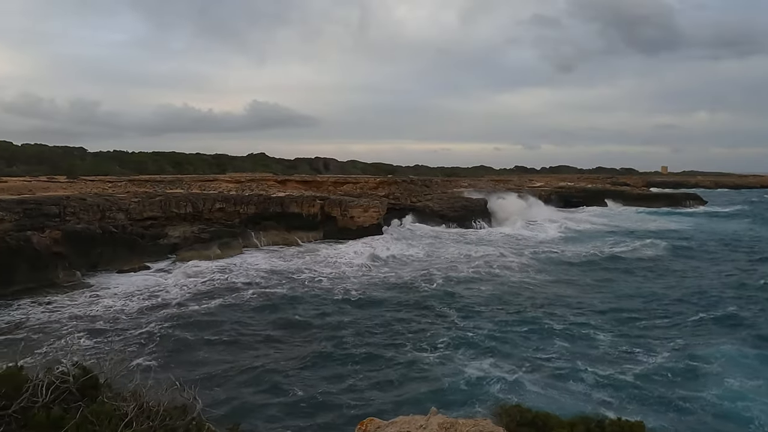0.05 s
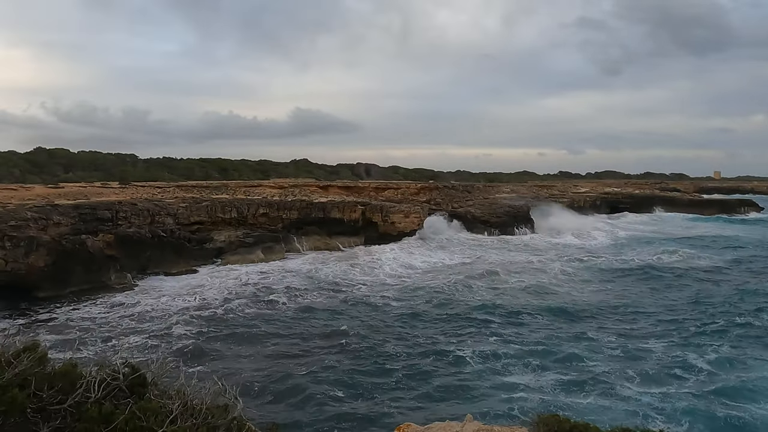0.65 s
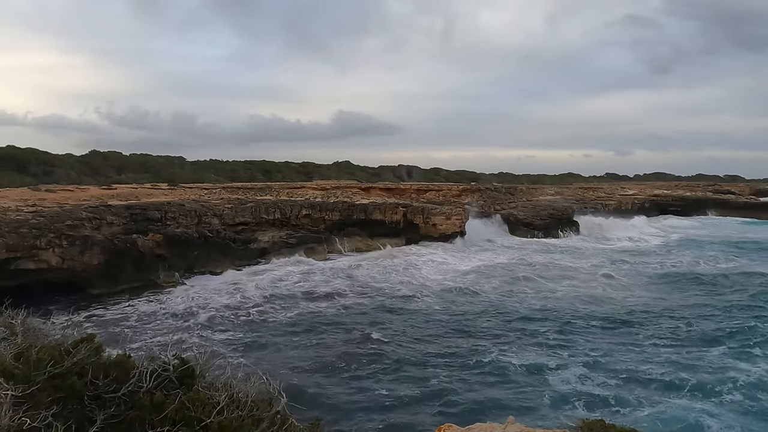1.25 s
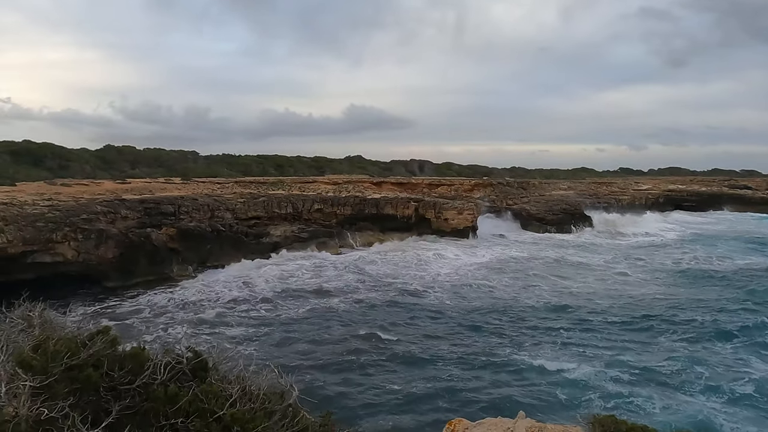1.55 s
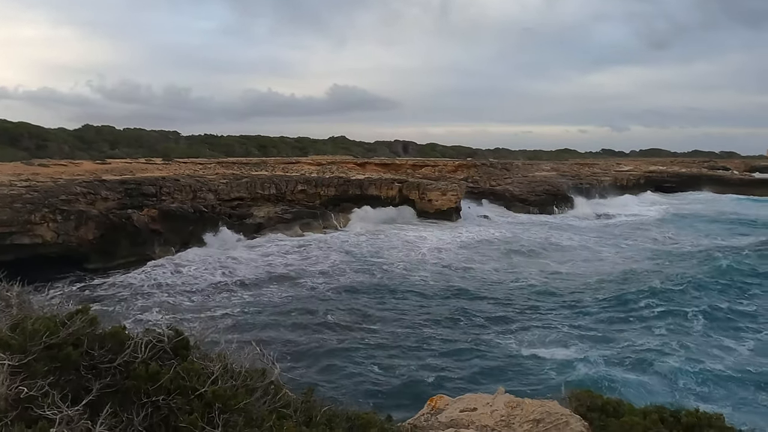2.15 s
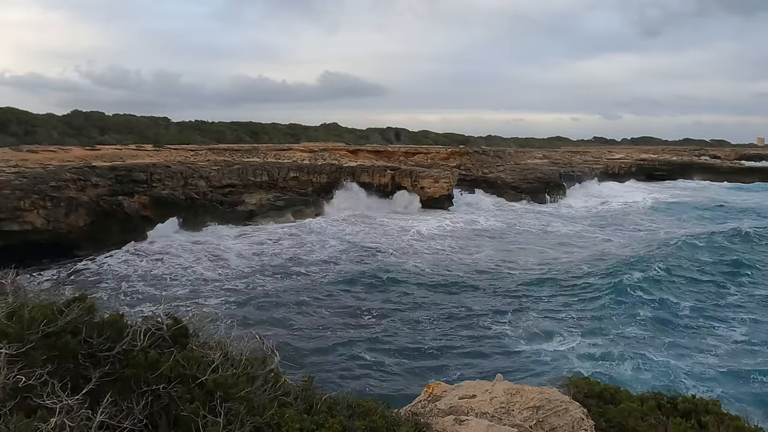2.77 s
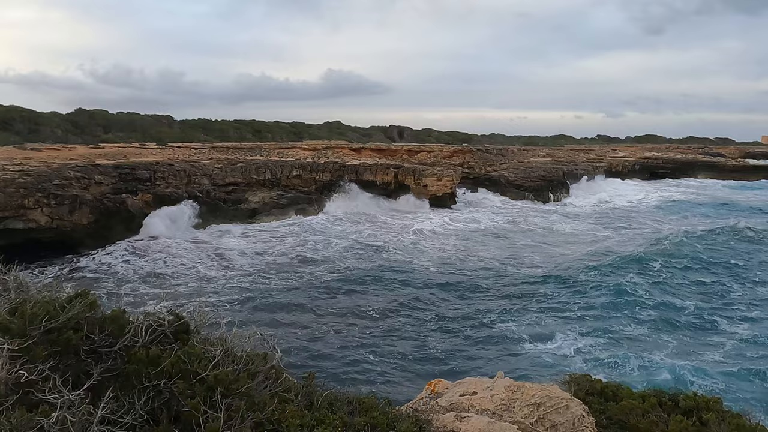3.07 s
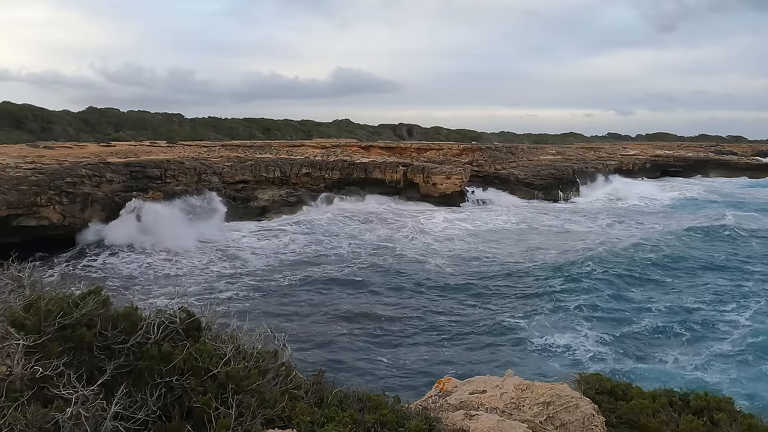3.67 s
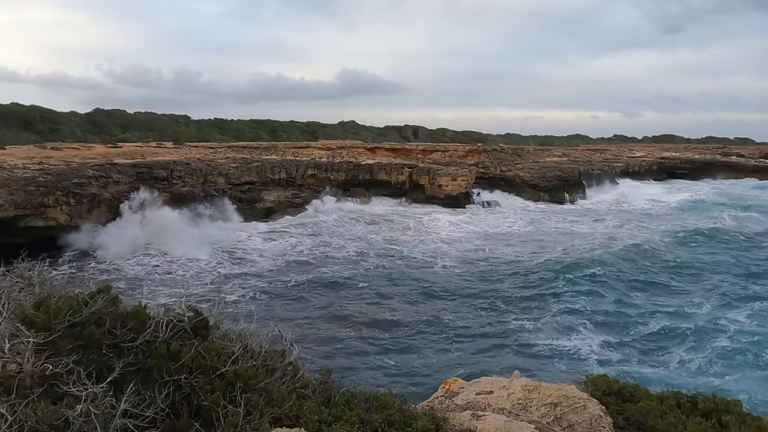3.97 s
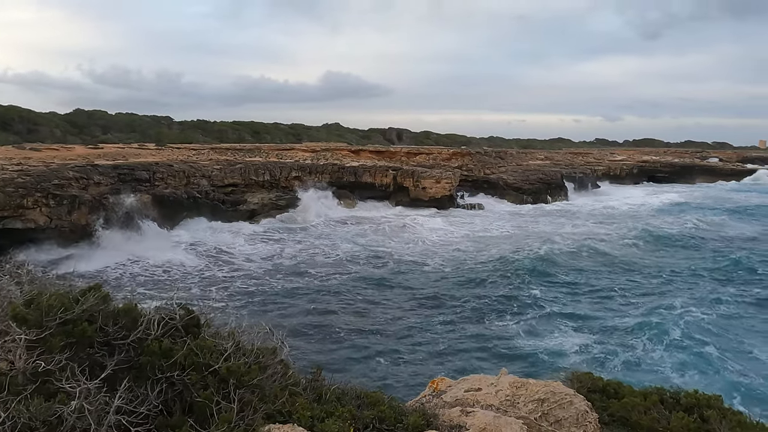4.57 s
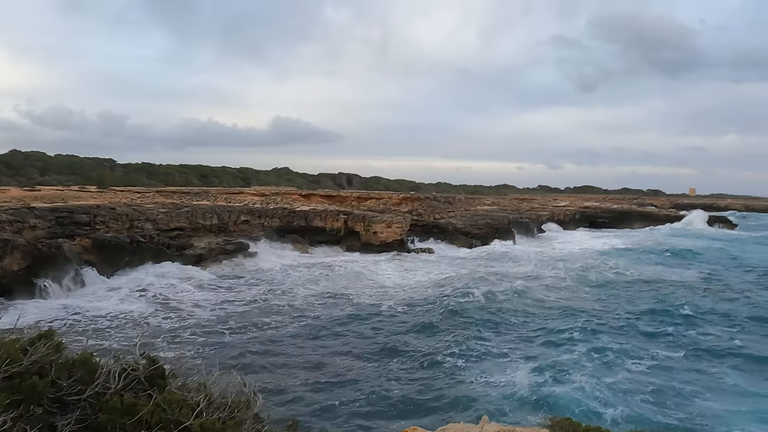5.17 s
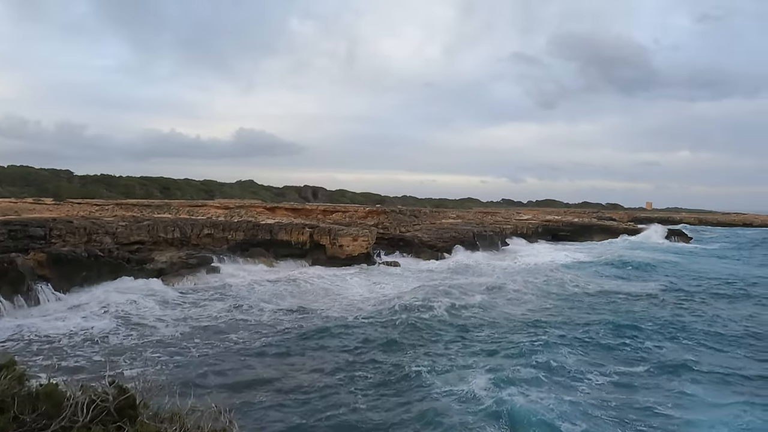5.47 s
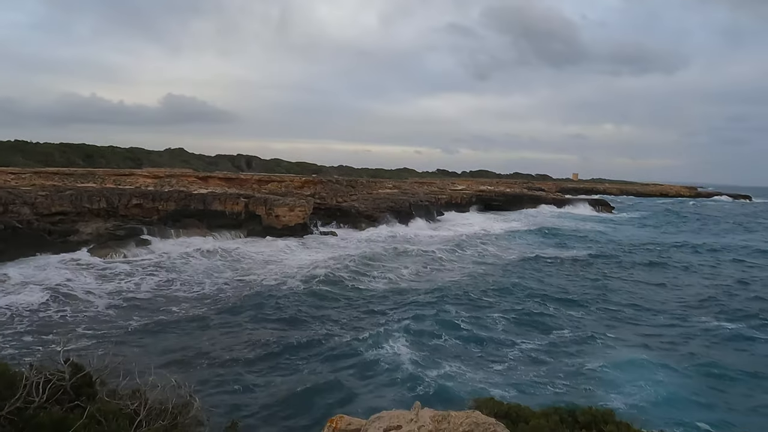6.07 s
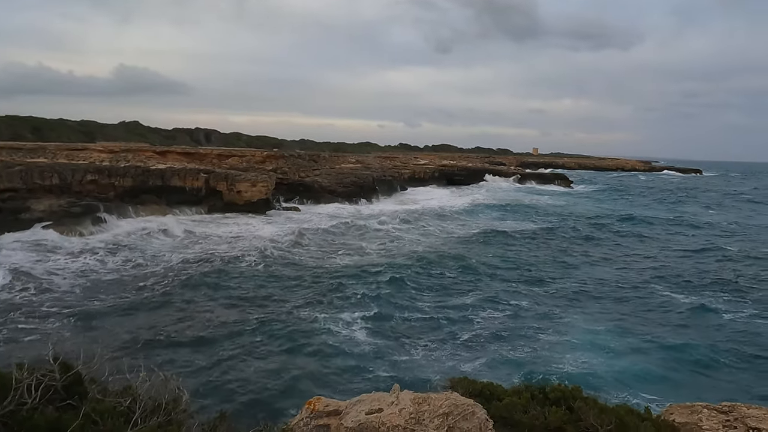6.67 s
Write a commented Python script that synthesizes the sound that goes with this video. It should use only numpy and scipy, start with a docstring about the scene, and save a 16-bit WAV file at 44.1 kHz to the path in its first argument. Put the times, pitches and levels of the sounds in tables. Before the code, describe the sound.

Sea waves wash against low rocky cliffs throughout, a continuous rush with a low roar underneath and hissing spray on top. Strong wind hits the microphone on the cliff top in deep, uneven rumbles, heaviest in the first second and a half. The surf swells at about 1 and 2 seconds, and water slaps into rock hollows with two soft, low thuds near 2.2 and 2.7 seconds. Another wave breaks around 3.7 to 4 seconds, and the brightest hiss of spray comes at about 5 seconds. More gusts buffet the microphone near 3.3, 3.5 and 4.6 seconds, then grow weaker. Dry scrub close by rustles faintly around 2 seconds and gives a few tiny ticks, mostly between 5.4 and 6 seconds. The sea keeps washing, with one more swell near 7 seconds.

```python
"""On a low rocky cliff top, in a strong wind, with surf washing along the rocks below.
Churning clouds of bubbles roar, breaking water and falling spray hiss, and now and then
a wave traps air in a rock hollow with a thud. Eddies (swirls of air) buffet the microphone,
and dry scrub beside it rustles and ticks."""
import sys
import numpy as np
from scipy import signal
from scipy.fft import rfft, irfft, next_fast_len
from scipy.io import wavfile
from scipy.ndimage import uniform_filter1d

SR = 44100
rng = np.random.default_rng(int(sys.argv[2]) if len(sys.argv) > 2 else 0)


def generate_wav(sig):
    """Save sig (samples, or channels by samples) to the path in sys.argv[1] as 16-bit PCM at SR."""
    pcm = np.round(np.clip(np.atleast_2d(sig).T, -1, 1) * 32767).astype(np.int16)
    wavfile.write(sys.argv[1], SR, pcm)


N = 305613
T = np.arange(N) / SR


def undb(db):
    """Turn decibels into a gain to multiply by."""
    return 10 ** (np.asarray(db) / 20)


def unit(x):
    """Scale a signal to an average strength (rms) of 1."""
    return x / np.sqrt(np.mean(x ** 2))


def colour(x, spectrum):
    """Shape the bass and treble of x along a curve of (f/Hz, level/dB) points."""
    size = next_fast_len(N + SR // 2)
    hz, db = np.transpose(spectrum)
    f = np.maximum(np.arange(size // 2 + 1) * SR / size, 0.5)
    gain = undb(np.interp(np.log(f), np.log(hz), db))
    return irfft(rfft(x, size) * gain, size)[:N]


def wander(per_second):
    """A smooth random wobble that heads for a new value per_second times a second."""
    hold = max(int(SR / per_second), 2)
    steps = np.repeat(rng.standard_normal(N // hold + 2), hold)
    steps = steps[rng.integers(hold):][:N]
    return unit(uniform_filter1d(uniform_filter1d(steps, hold), hold))


def grains(per_second, spread_db):
    """A shower of tiny impacts of random strength."""
    hits = (rng.random(N) < per_second / SR) * rng.standard_normal(N)
    return unit(hits * undb(spread_db * np.minimum(rng.exponential(size=N), 4)))


def swell(s, rise_s, fall_s):
    """A gain that grows to 1 at time s and dies away again."""
    return np.exp(-np.abs(T - s) / np.where(T < s, rise_s, fall_s))


def scrub(rustle_db=4, stir_db=-78, tick_s=.003, tick_db=-5):
    """Dry twigs stir faintly and brush each other in a gust; single ones tick."""
    # bursts of rustling: t/s, build-up/s, die-away/s, relative level/dB
    rustles = [(1.9, 0.11, 0.11, -60), (6.93, .05, .14, -62)]
    # single twigs ticking: t/s, relative level/dB
    ticks = [(.459, -46), (.745, -48), (.882, -43), (3.895, -38), (5.381, -33), (5.392, -38), (5.892, -36),
             (6.055, -42)]
    # tone of the rustle: f/Hz, level/dB
    rustle_tone = [(1500, -25), (4000, -6), (8000, 9.5), (11000, 3.5), (15500, -3)]
    # tone of a tick: f/Hz, level/dB
    tick_tone = [(1500, -20), (4000, -1), (6500, 6), (8500, -2), (11000, -9), (15500, -15)]
    brushing = undb(stir_db) + sum(undb(db) * swell(s, rise, fall) for s, rise, fall, db in rustles)
    rustle = grains(per_second=5000, spread_db=-3.0) * undb(rustle_db) * brushing
    taps = sum(undb(db + tick_db) * (T >= s) * np.exp(-np.abs(T - s) / tick_s) for s, db in ticks)
    return colour(rustle, rustle_tone) + colour(taps * rng.standard_normal(N), tick_tone)


def eddies(spectrum, span_s):
    """Swirling air pushes at random, its strength kept even over span_s seconds."""
    pressure = colour(rng.standard_normal(N), spectrum)
    size = max(int(span_s * SR), 2)
    power = uniform_filter1d(uniform_filter1d(pressure ** 2, size), size)
    return pressure / np.sqrt(power + 1e-12)


def gusting(breeze_flutter_db=-10):
    """Gains of deep buffeting and finer flutter: short gusts ride on the breeze."""
    # the wind between gusts: t/s, level/dB
    breeze = [(0, -25.5), (1.6, -23), (1.8, -35), (4.5, -28.5), (5.4, -31.5), (5.75, -40.5), (6.93, -32.5)]
    # gusts hitting the microphone: t/s, half length/s, buffeting/dB, flutter/dB
    gusts = [(0.077, .05, -15, -41), (0.555, 0.19, -22.5, -32.5), (0.865, 0.054, -16, -27.5),
             (1.04, 0.088, -17, -39), (1.29, 0.087, -12.5, -41), (1.367, 0.072, -32, -21.5),
             (2.19, 0.087, -19, -40), (2.484, 0.096, -29, -36), (2.968, 0.088, -30, -34.5),
             (3.24, 0.048, -17.5, -47), (3.518, 0.057, -16.5, -44), (4.576, 0.1, -17, -35),
             (5.364, 0.061, -30, -33), (5.52, .04, -25, -38), (5.975, 0.077, -24.5, -55),
             (6.707, .05, -30, -39)]
    times, breeze_db = np.transpose(breeze)
    buffet = undb(np.interp(T, times, breeze_db))
    flutter = buffet * undb(breeze_flutter_db)
    for s, half_s, buffet_db, flutter_db in gusts:
        gust = np.exp(-((T - s) / half_s) ** 2)
        buffet = np.hypot(buffet, undb(buffet_db) * gust)
        flutter = np.hypot(flutter, undb(flutter_db) * gust)
    return buffet, flutter


def wind(sway_db=-15.0, unrest_db=1.5):
    """Large eddies sway the air pressure; gusts shed smaller ones that rumble on the microphone."""
    # tone of the deep buffeting: f/Hz, relative level/dB
    buffet_tone = [(8, -9.5), (18, 2), (30, 8.5), (46, -6.5), (65, -18), (120, -42.5), (600, -87)]
    # tone of the finer flutter: f/Hz, relative level/dB
    flutter_tone = [(20, -20), (50, 2), (68, 0.5), (100, -10), (200, -21), (500, -36.5), (2000, -75)]
    # the slow sway, mostly too low to hear: f/Hz, relative level/dB
    sway_tone = [(1, 5.5), (4, 5.5), (9, 5.5), (14, 0.5), (22, -15), (40, -30), (100, -62), (300, -100)]
    buffet_gain, flutter_gain = gusting()
    buffet = buffet_gain * eddies(buffet_tone, span_s=0.073)
    flutter = flutter_gain * eddies(flutter_tone, span_s=0.066)
    sway = undb(sway_db) * eddies(sway_tone, span_s=0.21)
    return sway + (buffet + flutter) * undb(unrest_db * wander(per_second=18))


def hollows(width_s=0.012, roughness=0.51):
    """Air trapped by a wave in a rock hollow swells into a short low note."""
    # water slapping into hollows: t/s, f/Hz, peak level/dB
    thuds = [(2.15, 178.6, -29.5), (2.725, 177.2, -30)]
    out = 0
    for s, hz, db in thuds:
        note = np.sin(2 * np.pi * hz * T + roughness * wander(per_second=60))
        out = out + undb(db) * np.exp(-((T - s) / width_s) ** 2) * note
    return out


def churn(x, depth_db, per_second):
    """Bubble clouds of each size swell and collapse on their own, so every octave flutters."""
    out, rest = 0, x
    for edge_hz in 150 * 2 ** np.arange(7):
        band = signal.sosfiltfilt(signal.butter(2, edge_hz, fs=SR, output="sos"), rest)
        out = out + band * undb(depth_db * wander(per_second))
        rest = rest - band
    return unit(out + rest)


def breaking(roar_linger=1.03):
    """Gains of roar, wash and spray: each breaking wave adds its power to the restless sea."""
    # the sea between waves, in relative levels: roar/dB, wash/dB, spray/dB
    sea_db = (-43, -45.5, -57)
    # waves on the rocks: crest t/s, build-up/s, die-away/s, then relative roar/dB, wash/dB, spray/dB
    breakers = [(.38, .16, 0.27, -41.5, -46, -56.5), (.85, 0.11, 0.49, -44, -45, -56),
                (1.15, 0.22, 0.98, -39.5, -46, -64), (1.98, 0.63, 0.32, -43, -41.5, -52.5),
                (2.25, .25, 1.0, -43, -47, -58), (3.25, 0.78, 0.78, -55, -44, -52),
                (3.68, 0.37, 0.34, -39, -41.5, -51), (4.0, 0.28, 0.57, -42, -44, -53),
                (4.98, 0.47, 0.37, -42, -40, -46), (5.6, 0.67, 0.78, -44, -44.5, -54.5),
                (6.08, 0.21, .4, -46.5, -48.5, -61), (6.9, 0.37, .6, -45, -44, -57.5)]
    roar, wash, spray = undb(sea_db) ** 2
    for s, rise_s, fall_s, roar_db, wash_db, spray_db in breakers:
        wave = swell(s, rise_s, fall_s)
        roar = roar + (undb(roar_db) * swell(s, rise_s, fall_s * roar_linger)) ** 2
        wash = wash + (undb(wash_db) * wave) ** 2
        spray = spray + (undb(spray_db) * wave) ** 2
    return np.sqrt([roar, wash, spray])


def surf(roar_db=1.79, wash_db=1, spray_db=2.0):
    """Big bubble clouds roar, breaking water washes over rock, and drops of spray patter back."""
    # low tone of the bubble clouds: f/Hz, relative level/dB
    roar_tone = [(40, -10), (110, 3.5), (170, 0), (260, -0.5), (420, -0.5), (650, -4), (1000, -12.5),
                 (2000, -31.5), (6000, -60)]
    # middle tone of the washing water: f/Hz, relative level/dB
    wash_tone = [(200, -20), (500, -6.5), (850, 0), (1300, -1.5), (2000, -4.5), (3000, -9), (4000, -13),
                 (5500, -20), (8000, -26.5), (15500, -66)]
    # high tone of the spray: f/Hz, relative level/dB
    spray_tone = [(1500, -18), (3000, 3), (4200, 1.5), (5500, -0.5), (7000, -5), (8300, -3.5), (9200, -8.5),
                  (10300, -16), (12300, -18), (14000, -21), (15600, -30)]
    roar_gain, wash_gain, spray_gain = breaking()
    bubbles = colour(rng.standard_normal(N), roar_tone)
    roar = roar_gain * churn(bubbles, depth_db=1.6, per_second=14)
    water = colour(grains(per_second=22000, spread_db=0.7), wash_tone)
    wash = wash_gain * churn(water, depth_db=0.93, per_second=18)
    drops = unit(colour(grains(per_second=24000, spread_db=0.6), spray_tone))
    spray = spray_gain * drops * undb(0.72 * wander(per_second=28))
    return undb(roar_db) * roar + undb(wash_db) * wash + undb(spray_db) * spray


def scene():
    """The sea below, with wind and scrub close by, in one channel."""
    return (surf() + hollows() + wind() + scrub())[None]


def record(dry, top_hz=15700):
    """Cut away the highest treble."""
    return signal.sosfiltfilt(signal.ellip(10, .05, 60, top_hz, fs=SR, output="sos"), dry)


dry = scene()
out = record(dry)
generate_wav(out)
```